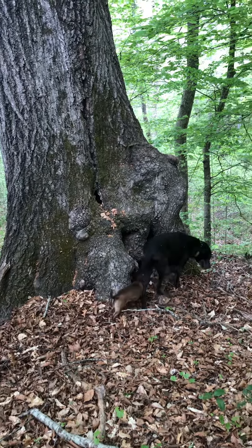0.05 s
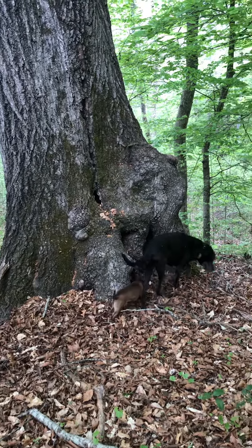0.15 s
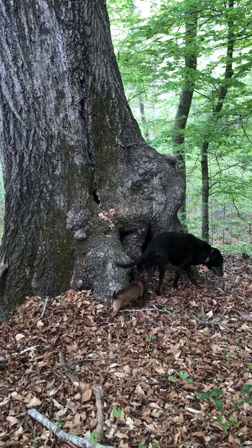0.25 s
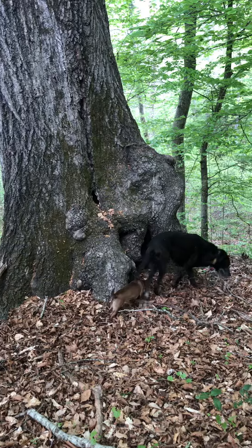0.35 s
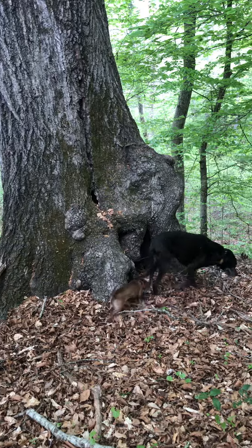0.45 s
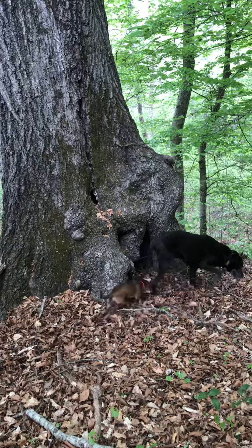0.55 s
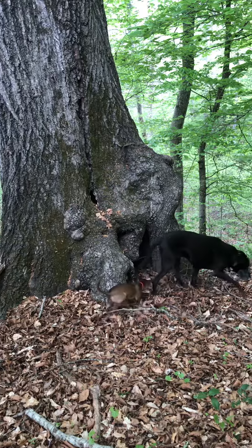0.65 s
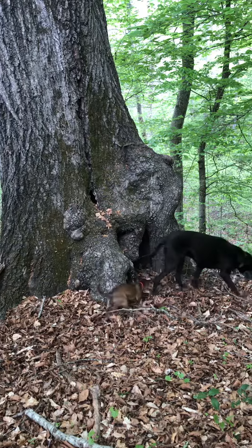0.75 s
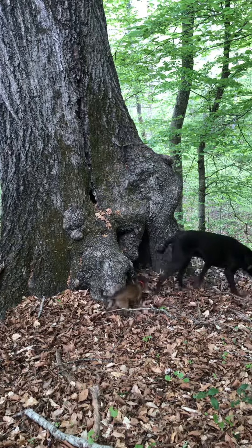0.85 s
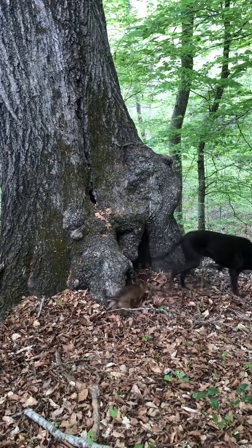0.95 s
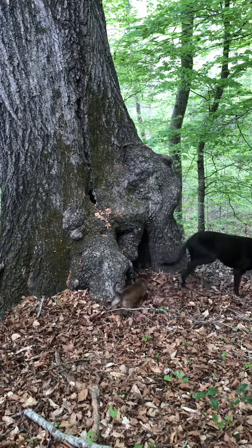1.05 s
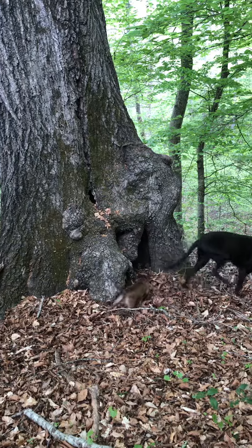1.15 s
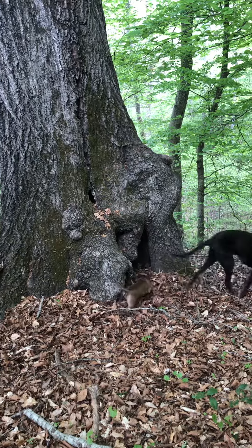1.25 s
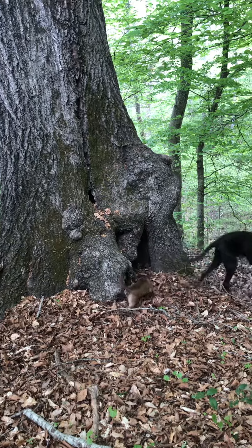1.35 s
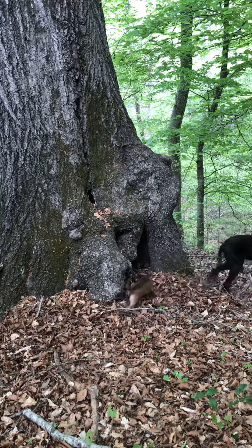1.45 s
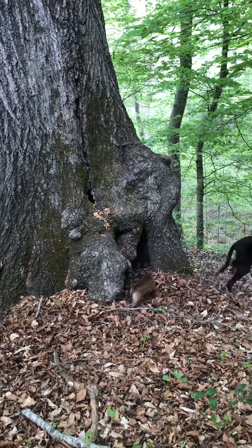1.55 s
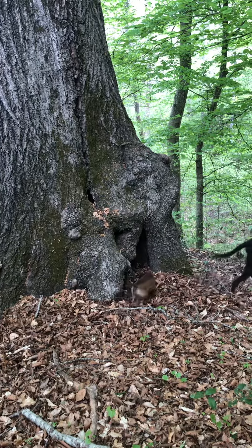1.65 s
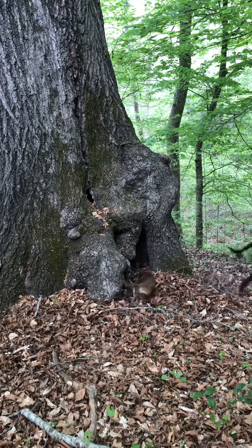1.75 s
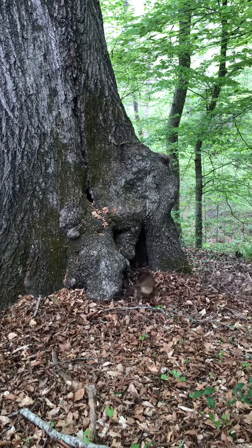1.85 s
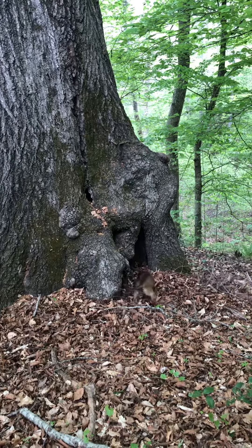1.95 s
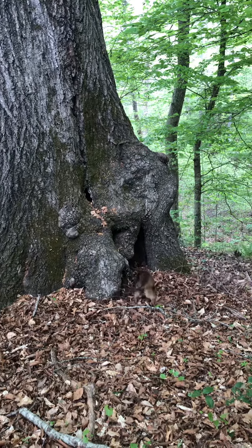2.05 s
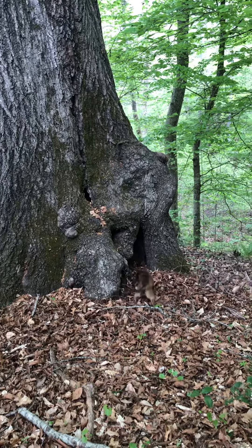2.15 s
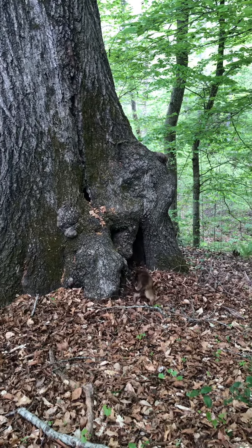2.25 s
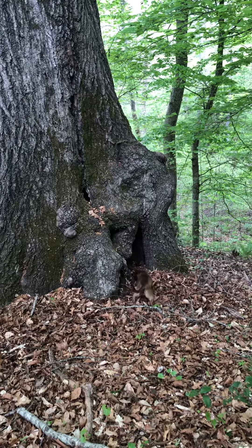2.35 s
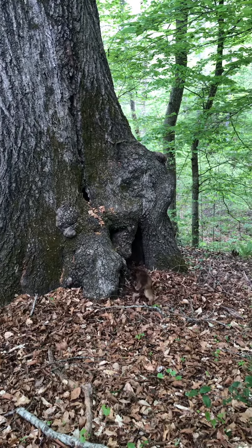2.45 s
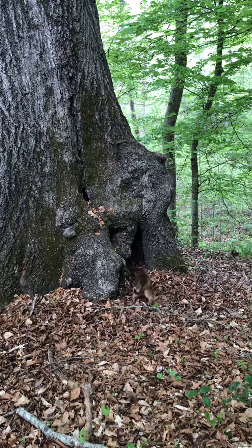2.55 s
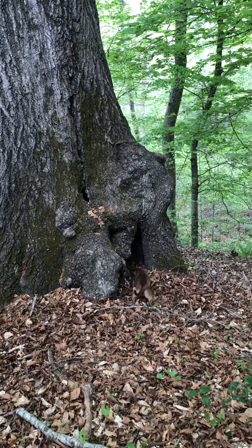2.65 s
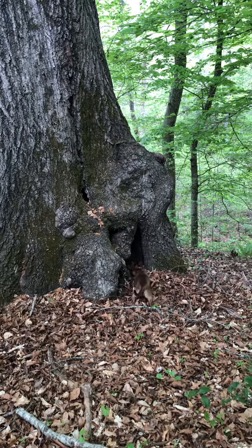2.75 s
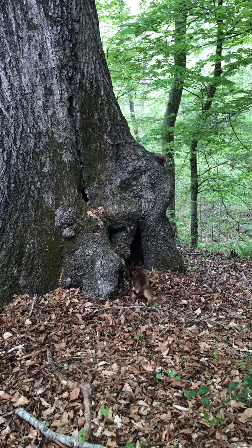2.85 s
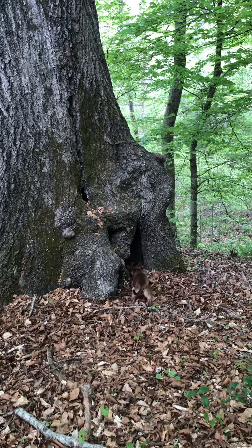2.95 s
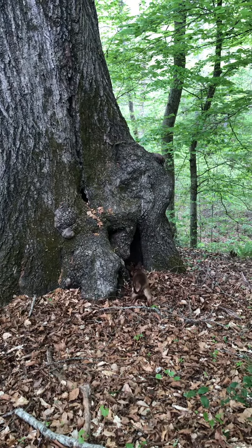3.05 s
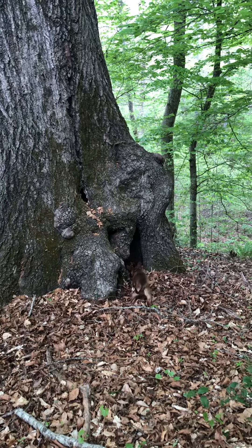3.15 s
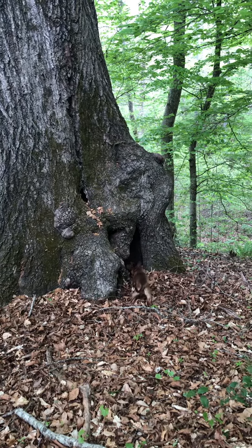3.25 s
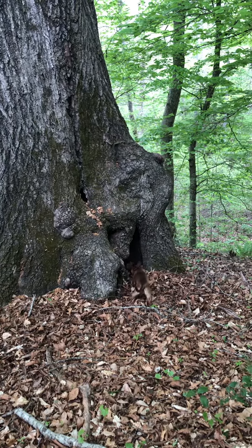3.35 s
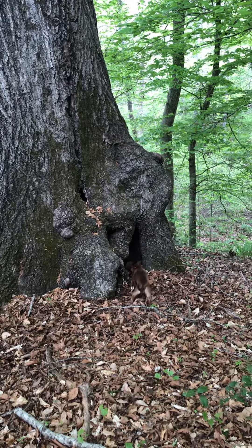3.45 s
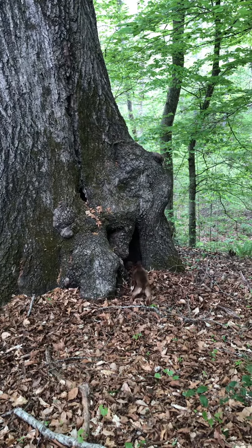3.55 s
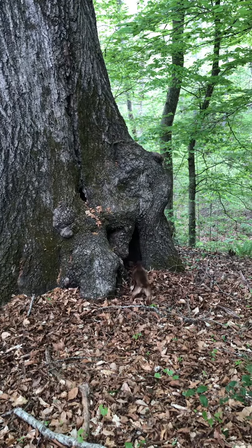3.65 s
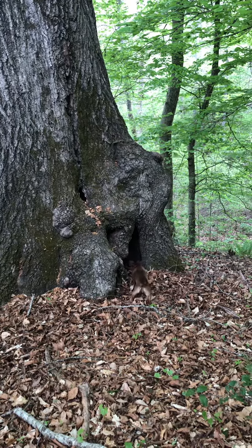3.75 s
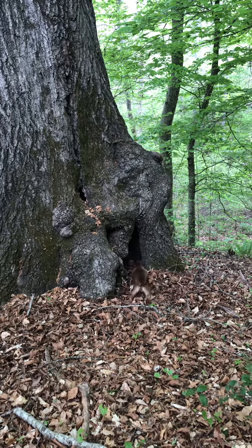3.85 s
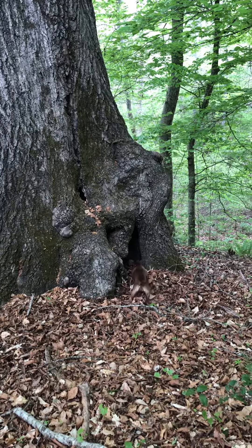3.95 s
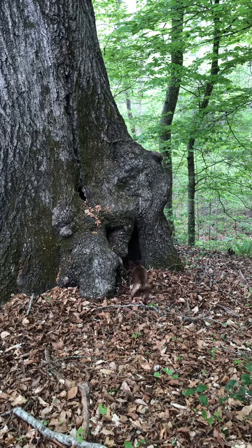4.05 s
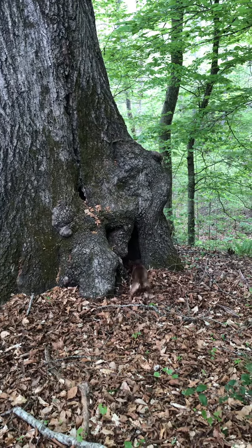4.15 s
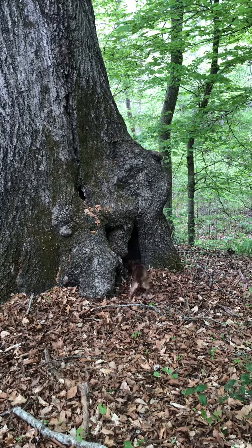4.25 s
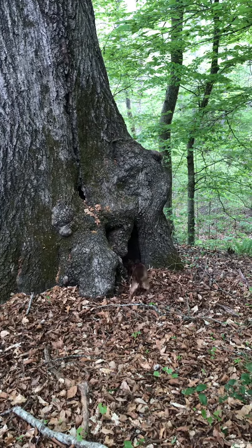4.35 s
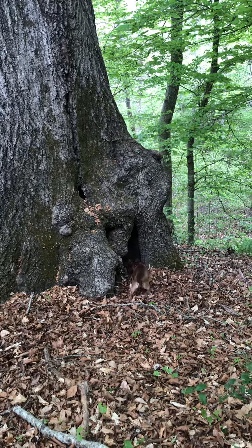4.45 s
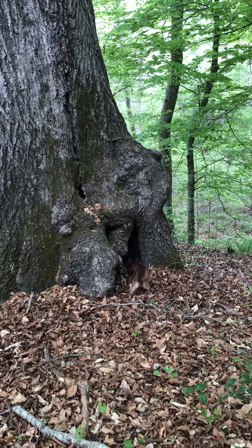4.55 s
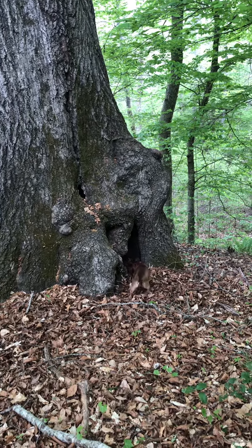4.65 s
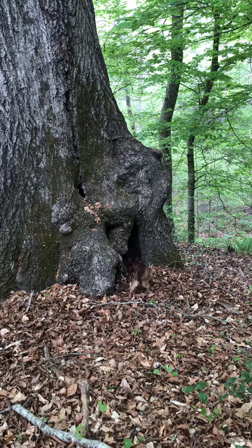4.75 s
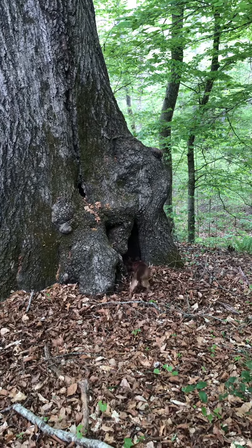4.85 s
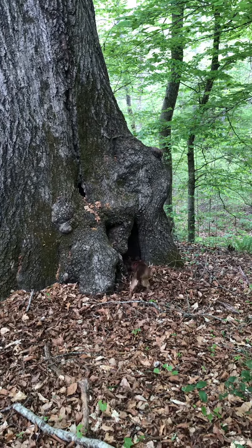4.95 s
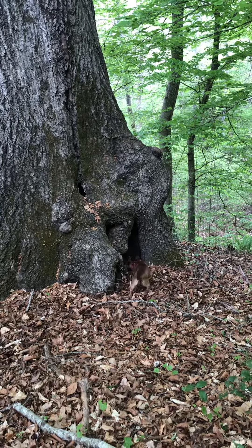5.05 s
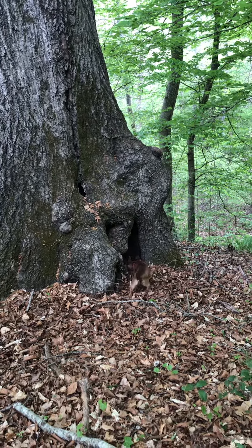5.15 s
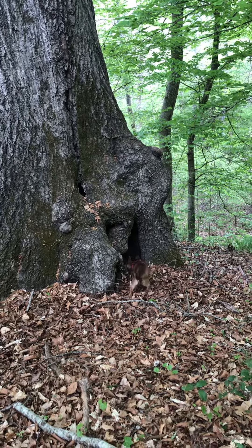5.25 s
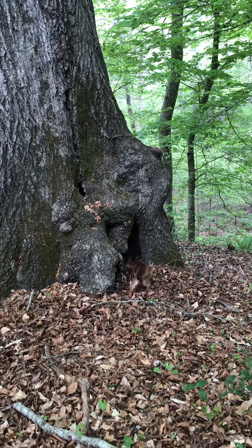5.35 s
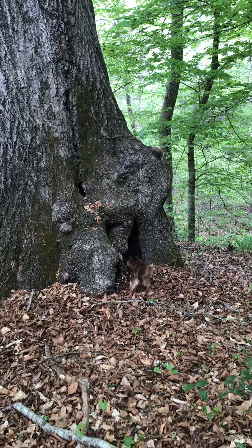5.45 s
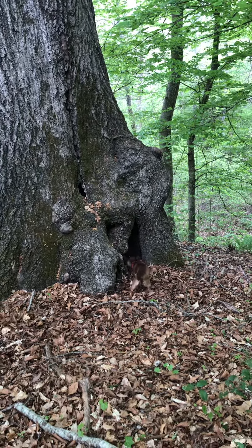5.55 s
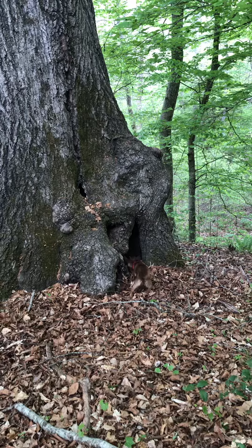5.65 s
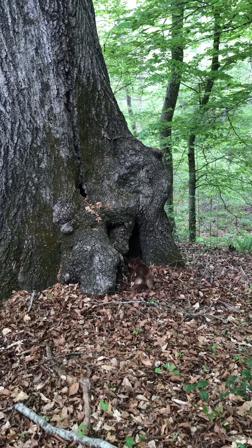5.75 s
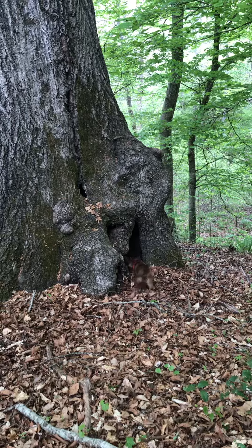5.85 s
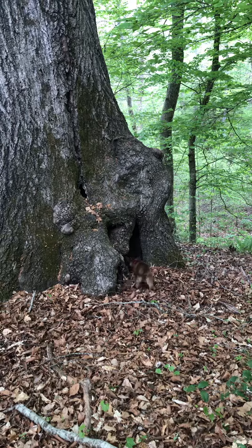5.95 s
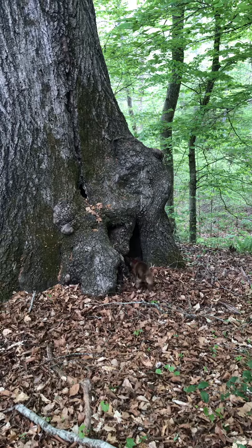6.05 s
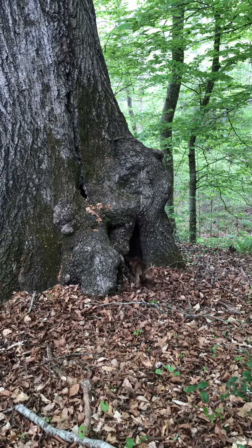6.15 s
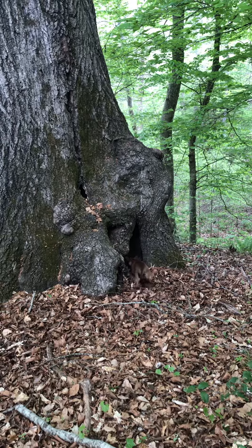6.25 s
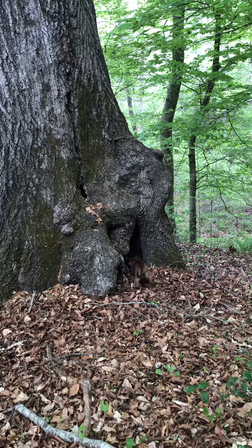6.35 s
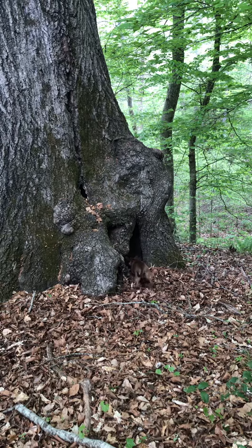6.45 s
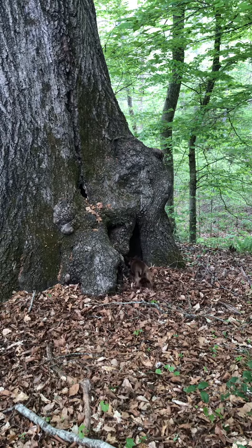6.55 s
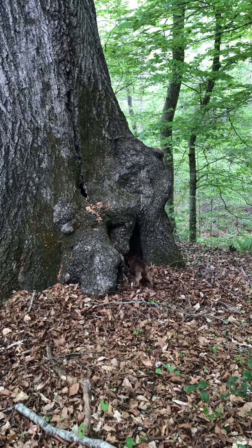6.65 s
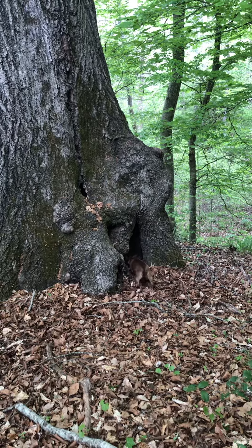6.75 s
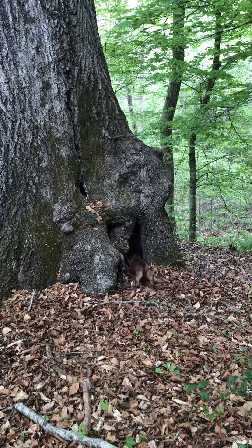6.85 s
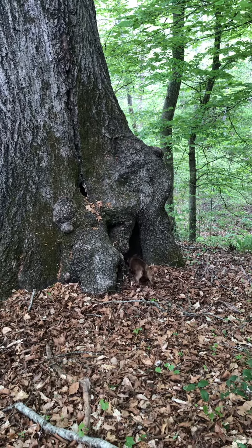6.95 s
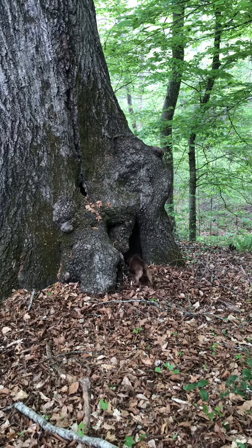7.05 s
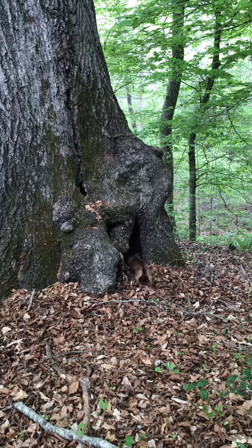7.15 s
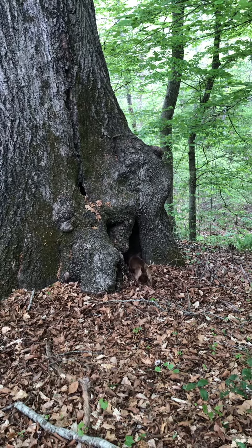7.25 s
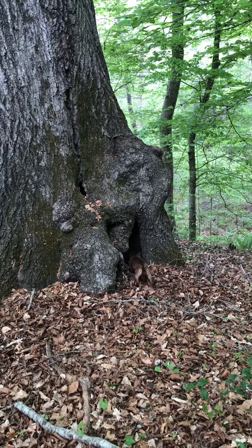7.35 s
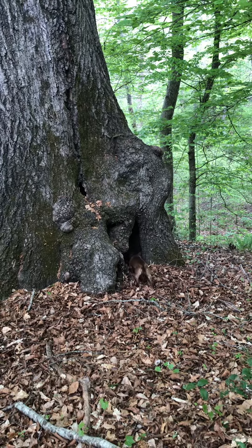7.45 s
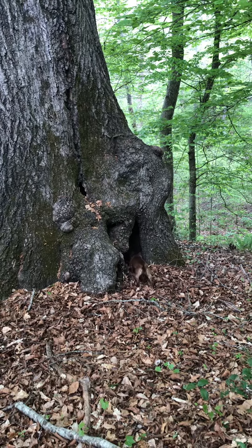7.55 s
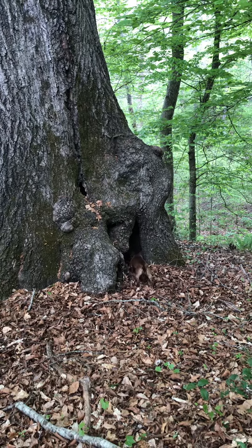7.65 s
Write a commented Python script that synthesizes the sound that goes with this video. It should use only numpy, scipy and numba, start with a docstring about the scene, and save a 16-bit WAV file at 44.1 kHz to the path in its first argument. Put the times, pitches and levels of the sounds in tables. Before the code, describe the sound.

Crunchy pawing and steps in dry leaves thin out, pause, then resume as a dog scratches at a hollow tree.

```python
"""Forest floor, one microphone a few metres from two dogs at the foot of a hollow tree.
At first both nose and dig in dry leaves: each paw stroke crushes a swarm of tiny cracks and scuffs the
soil, a stick knocks, twigs snap, and the trunks scatter it all. From about 3 s far birds call and the
rustle thins as one dog trots off. The other pauses near 4.5 s, leaving the forest's low rumble and
faint hum, then digs on from 5.7 s, its claws catching the rim of the hollow in the last second."""
import sys
import numpy as np
from scipy import signal
from scipy.fft import rfft, irfft, next_fast_len
from scipy.io import wavfile
from numba import njit

SR = 44100
rng = np.random.default_rng(int(sys.argv[2]) if len(sys.argv) > 2 else 0)


def unload_wav(signal):
    """Save mono or channel-first audio to the path in sys.argv[1] as 16-bit WAV at rate SR, clipped to [-1, 1]."""
    wavfile.write(
        sys.argv[1],
        SR,
        np.round(np.clip(np.atleast_2d(signal).T, -1, 1) * 32767).astype(np.int16),
    )


N = 339129
TIME = np.arange(N) / SR

# spectrum of the dry leaves: f/Hz, level/dB
LEAF_SPECTRUM = [(800, -34), (1500, -7), (2300, -4.5), (3400, 0), (5100, 0), (6200, -2.5), (7300, -1.5),
                 (9500, -3), (11000, -4.5), (13300, -3), (16000, -5.5)]
# spectrum of the scuffed soil: f/Hz, level/dB
SOIL_SPECTRUM = [(80, -26), (230, 1.5), (340, -5.5), (500, 1.5), (750, -1.5), (1100, 2.5), (1700, -0.5),
                 (2600, -4), (5000, -8.5)]
# how deep the paws reach, as soil scuff relative to the rustle: t/s, level/dB
SOIL_SCUFF = [(0, -15), (.25, -8.5), (.6, -10.5), (1.1, -10.5), (1.8, -11), (2.3, -9), (3.1, -7.5),
              (3.7, -12), (4.4, -10.5), (5.0, -10), (5.8, -13.5), (6.3, -7), (6.9, -13), (7.69, -8.5)]


def digging(cracks_per_s=4200, slide_db=-1.0, gain_db=1.42):
    """Leaves crack and slide a few metres off; harder strokes break more of them and scuff the soil."""
    level_db = paw_effort()
    force = undb(level_db - np.mean(level_db))
    # under a hard stroke the flurries merge into one crunch
    flurry_share = np.clip(0.63 / np.sqrt(force), 0, .5)
    collapses = buckling(rate=150, spread_db=3.5, decay_s=0.0085)
    flurries = np.sqrt(1 - flurry_share + flurry_share * collapses ** 2)
    cracks = crackle(cracks_per_s * force ** .8, spread_db=3.5, cycles=1.1)
    sliding = undb(slide_db) * rng.standard_normal(N)
    leaves = shifting(colour(cracks + sliding, LEAF_SPECTRUM), sway_db=1.85, rate=35)
    crumbs = crackle(7000 * force ** .4, spread_db=4.5, cycles=0.44) + .5 * rng.standard_normal(N)
    soil = unit(colour(crumbs, SOIL_SPECTRUM)) * undb(curve(SOIL_SCUFF) + 1.7 * wander(60))
    return (leaves * flurries + soil) * undb(level_db + gain_db)


# steps and paw strokes in the litter: t/s, length of the push/s, level/dB
PAW_STROKES = [(0.011, 0.032, -42.5), (0.193, 0.034, -34.5), (0.414, 0.11, -39.5), (0.644, 0.056, -37.5),
               (0.787, 0.07, -42.5), (0.943, 0.049, -49.5), (1.149, 0.031, -43), (1.24, 0.074, -37.5),
               (1.345, 0.051, -42.5), (1.445, 0.074, -43), (1.761, 0.069, -44), (1.84, 0.038, -42),
               (1.965, 0.036, -45), (2.068, 0.062, -46), (2.284, 0.037, -44.5), (2.393, 0.043, -53),
               (2.549, 0.048, -46.0), (2.933, 0.049, -48.0), (3.034, 0.042, -43), (3.173, 0.011, -50.5),
               (3.35, 0.051, -46), (3.632, 0.04, -48), (3.882, 0.051, -50), (3.954, 0.06, -49),
               (4.148, 0.055, -52.5), (4.225, 0.041, -53), (4.357, 0.058, -53.5), (5.232, 0.061, -65.5),
               (5.569, 0.01, -64.5), (5.704, 0.049, -54.5), (5.889, 0.011, -44.5), (5.991, 0.01, -49.5),
               (6.035, 0.1, -53.0), (6.358, 0.065, -55.5), (6.488, 0.011, -46.5), (6.632, 0.018, -49),
               (6.811, 0.038, -45), (6.933, 0.065, -43.0), (7.128, 0.019, -51.5), (7.297, 0.03, -49),
               (7.374, 0.037, -47.0), (7.487, 0.063, -50.5), (7.639, 0.11, -48.5)]
# noses and bodies stirring the leaves between strokes: t/s, level/dB
LEAF_STIR = [(0.0, -49), (0.17, -53.5), (0.4, -46.5), (1.0, -46.5), (1.12, -51), (1.6, -44), (2.2, -57),
             (3.2, -53.5), (3.6, -59.5), (4.48, -59.0), (4.55, -71), (5.15, -79.5), (5.65, -74), (5.8, -61),
             (6.3, -63), (6.75, -58), (7.2, -50), (7.69, -60)]


def paw_effort(attack_s=.009, press_db=4.5, release_s=0.051, stroke_db=-.5, stir_db=-1.0):
    """Rustle level in dB: over the stirring, each paw lands, bears down through its push and lets go."""
    power = undb(curve(LEAF_STIR) + stir_db) ** 2
    t = TIME[:SR // 2]
    for s, push_s, db in PAW_STROKES:
        bearing_db = -press_db * np.maximum(1 - t / push_s, 0)
        shape = (1 - np.exp(-t / attack_s)) * np.exp(-np.maximum(t - push_s, 0) / release_s)
        add(power, s, (shape * undb(db + stroke_db + bearing_db)) ** 2)
    return 10 * np.log10(power)


def crackle(rate, spread_db, cycles):
    """Tiny fractures at a rate per second: many weak, a few strong, each at its own pitch."""
    happens = rng.random(N) < rate / SR
    size = undb(spread_db * np.minimum(rng.exponential(size=N), 2.0)) * rng.choice([-1, 1], N)
    hz = rng.uniform(200, 17000, N)
    return unit(ring(happens * size / np.sqrt(rate), hz, float(cycles)))


@njit
def ring(size, hz, cycles):
    """Every nonzero size starts a damped sine that falls to 1 / e in so many cycles."""
    out = np.zeros(len(size))
    for i in range(len(size)):
        if size[i] != 0:
            life = cycles * SR / hz[i]
            pole = np.exp(2j * np.pi * hz[i] / SR - 1 / life)
            phasor = size[i] / np.sqrt(life) + 0j
            for j in range(i, min(i + int(6 * life), len(size))):
                phasor *= pole
                out[j] += phasor.imag
    return out


def buckling(rate, spread_db, decay_s):
    """Envelope of whole leaves giving way: each sets off a flurry of cracks that dies away."""
    happens = rng.random(N) < rate / SR
    power = happens * undb(spread_db * np.minimum(rng.exponential(size=N), 3)) ** 2
    fading_power = signal.lfilter([1], [1, -np.exp(-2 / (decay_s * SR))], power)
    return unit(np.sqrt(fading_power))


def shifting(x, sway_db, rate):
    """Other leaves come under the paw all the time, so every third-octave swells by itself."""
    size = next_fast_len(N)
    spectrum = rfft(x, size)
    hz = np.maximum(np.arange(len(spectrum)) * SR / size, 1)
    thirds = np.clip(3 * np.log2(hz / 800), 0, 13)
    bands = (irfft(spectrum * np.maximum(1 - np.abs(thirds - k), 0), size)[:N] for k in range(14))
    return unit(sum(band * undb(sway_db * wander(rate)) for band in bands))


def stalks(ticks_per_s=9, gain_db=-21):
    """Thin stalks around the paws tick at random, as loud as the work in the litter lets them."""
    ticks = crackle(ticks_per_s, spread_db=3, cycles=3)
    return unit(colour(ticks, LEAF_SPECTRUM)) * undb(paw_effort() + gain_db)


# stalks and twigs breaking under the dogs: t/s, level/dB, f/Hz, decay/ms
TWIG_SNAPS = [(0.1028, -26.5, 6740, 0.72), (.2236, -22, 6340, 0.94), (0.237, -17.5, 7040, 2.1),
              (0.263, -20, 12000, .8), (.2962, -13, 12200, 0.97), (.5005, -25.5, 7040, 2.8),
              (0.7364, -16, 6960, 0.48), (0.8086, -20, 3800, 1.1), (0.8082, -20.5, 11100, 1.3),
              (0.8108, -25, 10200, 4.4), (0.97, -30.5, 3960, 1.7), (1.179, -35, 6000, 1.0),
              (1.2114, -20.5, 3870, 0.6), (1.546, -21.5, 11200, 0.95), (1.7744, -23, 3950, 0.63),
              (1.7848, -25, 9000, .6), (2.1206, -21, 13000, 0.99), (2.1295, -24, 11000, .4),
              (2.437, -33, 4440, 1.0), (2.9457, -34, 7000, 1.5), (2.983, -32.5, 5050, .8),
              (3.179, -29, 3470, 0.71), (3.289, -33, 5900, 0.43), (3.6647, -24.5, 6850, 0.99),
              (4.1661, -35, 4500, 2.3), (4.4195, -40, 6940, 1.2), (4.499, -43, 5000, 1.5),
              (4.654, -47, 5950, 0.76), (4.775, -51, 3800, 2.1), (4.9038, -47, 5100, 1.6),
              (5.5757, -37, 10500, 0.26), (5.7953, -37.5, 3380, 0.81), (5.8977, -29.5, 4770, 0.89),
              (5.9947, -36.5, 5960, 1), (6.342, -43, 2200, .9), (6.499, -30, 4530, 1.3),
              (6.5328, -37, 7000, .46), (6.82, -27, 11000, 0.91), (7.1617, -30, 7000, 0.55),
              (7.2245, -23.5, 9000, 0.53), (7.487, -31.5, 6000, .75), (7.6729, -26.5, 6900, 1.4)]


def twigs(splinter=0.56, shake_db=-24, shake_s=0.025):
    """A break is a burst of tearing fibres that rings the twig and shakes the leaves around it."""
    out, t = np.zeros(N), TIME[:SR // 16]
    for s, db, hz, decay_ms in TWIG_SNAPS:
        fibres = rng.standard_normal(len(t))
        burst = fibres * (np.exp(-t * 1000 / decay_ms) + undb(shake_db) * np.exp(-t / shake_s))
        # thick twigs ring low and narrow, thin stalks tick high and broad
        width_hz = 1000 * (hz / 4000) ** 1.6
        body = signal.lfilter(*signal.iirpeak(hz, max(hz / width_hz, 1), fs=SR), burst)
        snap = unit(unit(body) + splinter * unit(burst))
        length_gain = np.sqrt(decay_ms / 4500 * SR / len(t))  # longer breaks carry more energy
        add(out, s, snap * length_gain * undb(db))
    return out


# blows on a dry stick on the ground: t/s, level/dB, pitch/ratio to its modes
STICK_KNOCKS = [(0.1487, -27.5, 0.953), (0.2377, -46, 1.4), (0.2957, -21.5, 0.86), (.3881, -26.5, 1.09)]
# the stick's modes: f/Hz, level/dB, t60/s
STICK_MODES = [(1030, -2, 0.028), (1460, 3, 0.015), (1810, -7, 0.03), (2130, 5.5, 0.015),
               (2660, 5.5, 0.0065), (3700, 10, 0.0052)]


def stick(gain_db=1.0):
    """Each blow lands on another spot and rings the damped wood modes in a new balance."""
    out, t = np.zeros(N), TIME[:SR // 20]
    hz, mode_db, t60 = np.transpose(STICK_MODES)[:, :, None]
    for s, db, pitch in STICK_KNOCKS:
        spot, phase = rng.standard_normal((2, len(STICK_MODES), 1))
        waves = np.sin(2 * np.pi * hz * pitch * t + np.pi * phase)
        knock = np.sum(undb(mode_db + 2 * spot) * waves * np.exp(-np.log(1000) * t / t60), axis=0)
        add(out, s, knock / np.max(np.abs(knock)) * undb(db + gain_db))
    return out


# claws catching on the rim of the hollow: t/s, level/dB
CLAW_SCRAPES = [(6.655, -58), (6.945, -56), (6.99, -56), (7.04, -51.5), (7.145, -56), (7.363, -52.5),
                (7.406, -53)]
# resonance of the cavity: f/Hz, level/dB
HOLLOW_SPECTRUM = [(350, -25), (520, 1), (640, -5), (800, 0), (1050, -18), (2500, -38)]


def hollow_tree(rise_s=0.0038, decay_s=0.014, gain_db=0.5):
    """At the foot of the tree each scrape is a short rasp on rotten wood, coloured by the cavity."""
    force, t = np.zeros(N), TIME[:SR // 6]
    for s, db in CLAW_SCRAPES:
        add(force, s, (1 - np.exp(-t / rise_s)) * np.exp(-t / decay_s) * undb(db + gain_db))
    rasp = crackle(2500, spread_db=2.0, cycles=0.62)
    return unit(colour(rasp, HOLLOW_SPECTRUM)) * force


def trunks(x, wet_db, t60):
    """Sparse reflections from the trees reach the microphone as a thin tail behind the direct sound."""
    t = TIME[:SR]
    reflections = rng.standard_normal(SR) * (rng.random(SR) < .1) * (t > .004)
    tail = reflections * np.exp(-np.log(1000) * t / t60)
    return x + undb(wet_db) * signal.fftconvolve(x, tail / np.linalg.norm(tail))[:N]


# calls from deep among the trees: t/s, length/s, start f/Hz, end f/Hz, level/dB
BIRD_CALLS = [(2.762, 0.074, 7150, 7100, -56), (2.805, 0.032, 6350, 6100, -54),
              (4.05, .085, 2540, 2480, -61), (4.594, 0.037, 2840, 2970, -71),
              (4.76, .31, 3570, 3070, -72.5), (4.99, 0.35, 1742, 1648, -79),
              (5.808, 0.033, 3800, 2760, -60)]


def birds(waver=0.00583, gain_db=-2.5):
    """Thin gliding whistles, far from the microphone."""
    out = np.zeros(N)
    wobble = 1 + waver * wander(70)
    for s, length_s, start_hz, end_hz, db in BIRD_CALLS:
        progress = np.clip((TIME - s) / length_s, 0, 1)
        hz = (start_hz + (end_hz - start_hz) * progress) * wobble
        swell = np.sqrt(4 * progress * (1 - progress))
        out += tone(hz) * swell * undb(db + gain_db)
    return out


# spectrum of the forest ambience: f/Hz, level/dB
AIR_SPECTRUM = [(20, -29), (32, -13), (55, -1), (120, 0.5), (190, -5), (270, -10), (430, -13), (680, -18.5),
                (1200, -22), (2500, -26), (4000, -28.5), (8000, -35), (16000, -38)]
# a distant drone that comes and goes: t/s, level/dB
DRONE_LEVEL = [(0, -73), (1.0, -81), (1.4, -67), (1.9, -71), (2.2, -64), (2.5, -74), (2.8, -59.5),
               (3.2, -75.5), (7.69, -74)]


def forest(air_db=-61.5, drone_hz=82, hum_hz=201, hum_db=-70.5):
    """Behind everything, far rumble and soft hiss with a wavering drone and a faint hum."""
    air = unit(colour(rng.standard_normal(N), AIR_SPECTRUM)) * undb(air_db + 0.38 * wander(2.8))
    drone = unit(tone(drone_hz + 3 * wander(12))) * undb(curve(DRONE_LEVEL) + 0.86 * wander(15))
    hum = unit(tone(hum_hz + 1.206 * wander(9))) * undb(hum_db + 1.75 * wander(8))
    return air + drone + hum


def undb(db):
    """Decibels to gain."""
    return 10 ** (np.asarray(db) / 20)


def unit(x):
    """Scale to rms 1."""
    return x / np.sqrt(np.mean(x ** 2))


def tone(hz):
    """A sine that follows a changing frequency."""
    return np.sin(2 * np.pi * np.cumsum(hz) / SR)


def curve(rows):
    """Join (t/s, value) rows by straight lines."""
    return np.interp(TIME, *np.transpose(rows))


def colour(x, points):
    """Filter by a spectrum of (f/Hz, level/dB) points."""
    hz, db = np.transpose(points)
    size = next_fast_len(len(x))
    bin_hz = np.maximum(np.arange(size // 2 + 1) * SR / size, 1)
    gain = undb(np.interp(np.log(bin_hz), np.log(hz), db))
    return irfft(rfft(x, size) * gain, size)[:len(x)]


def wander(rate):
    """Random drift of rms 1, changing course rate times a second."""
    return unit(np.interp(TIME * rate, np.arange(N), rng.standard_normal(N)))


def add(out, s, x):
    """Mix x in at time s."""
    i = int(np.clip(s * SR, 0, N - 1))
    out[i:i + len(x)] += x[:N - i]


def scene():
    """In mono: the dogs a few metres off and mostly direct, the birds far away and full of echo."""
    dogs = trunks(digging() + stalks() + twigs() + stick() + hollow_tree(), wet_db=-15, t60=0.65)
    far_birds = trunks(birds(), wet_db=1, t60=0.85)
    return (dogs + far_birds + forest())[None]


def record(dry):
    """The recorder cuts the top steeply above 15.8 kHz."""
    return signal.sosfilt(signal.ellip(10, .2, 70, 15800, fs=SR, output="sos"), dry)


dry = scene()
out = record(dry)
unload_wav(out)
```